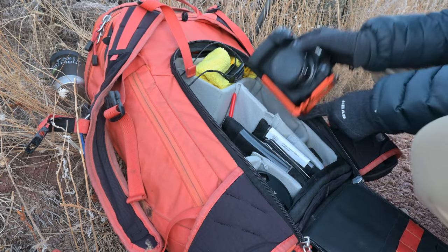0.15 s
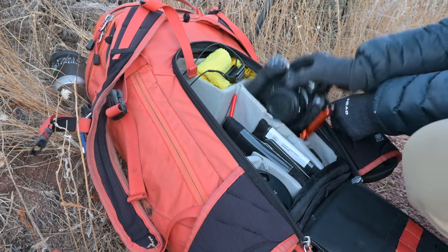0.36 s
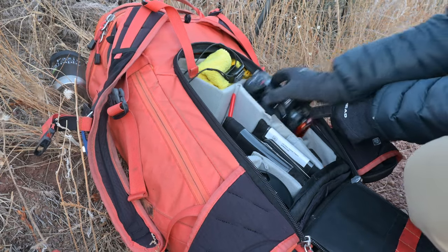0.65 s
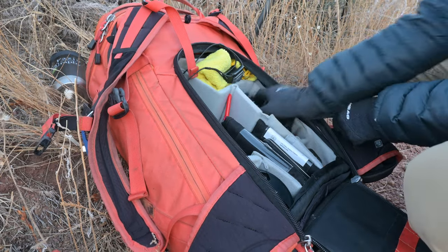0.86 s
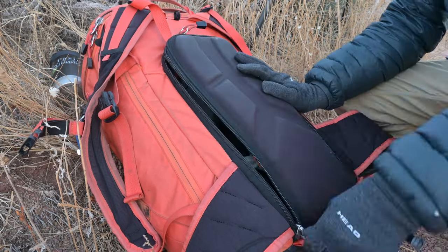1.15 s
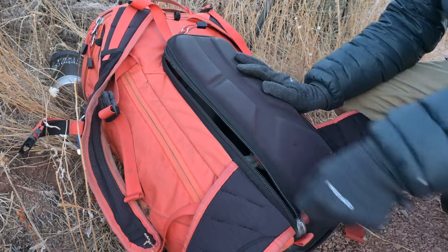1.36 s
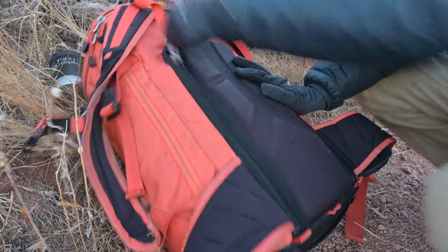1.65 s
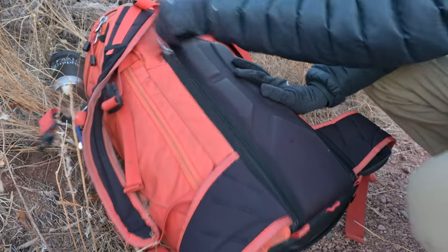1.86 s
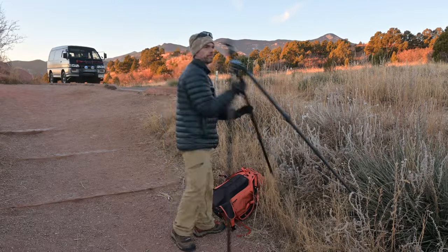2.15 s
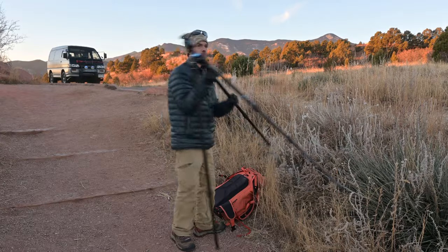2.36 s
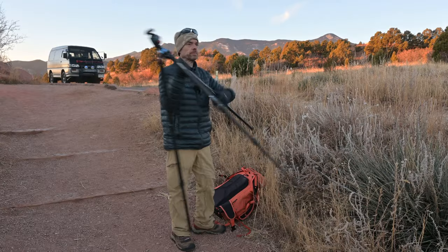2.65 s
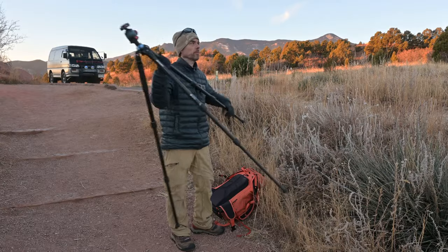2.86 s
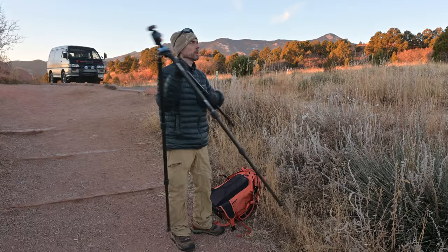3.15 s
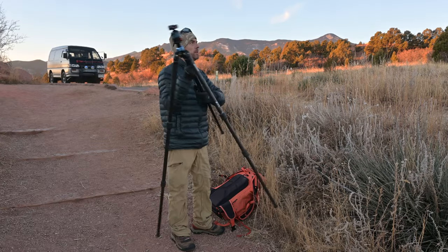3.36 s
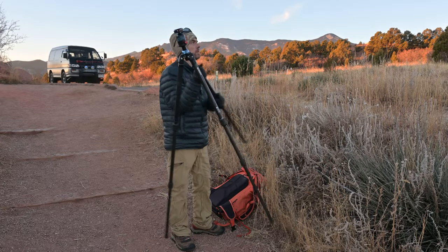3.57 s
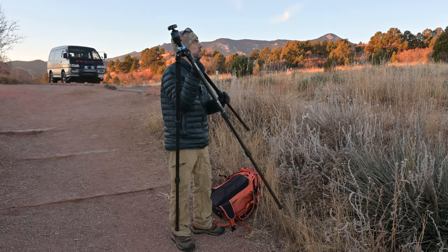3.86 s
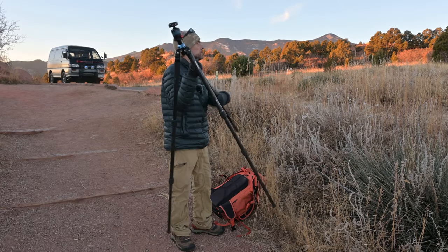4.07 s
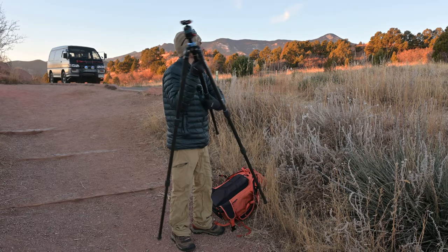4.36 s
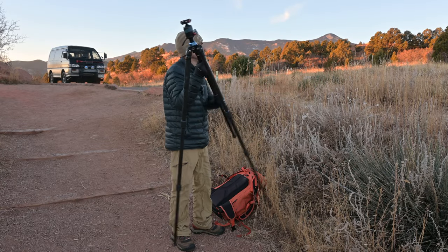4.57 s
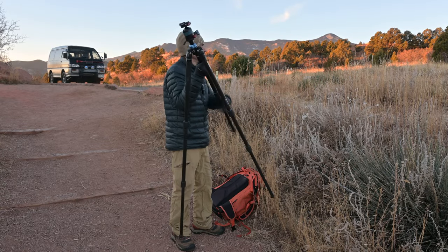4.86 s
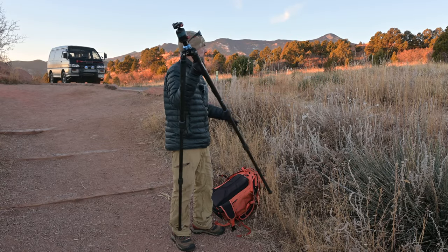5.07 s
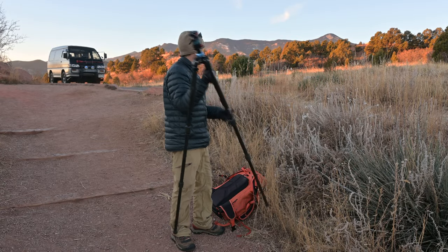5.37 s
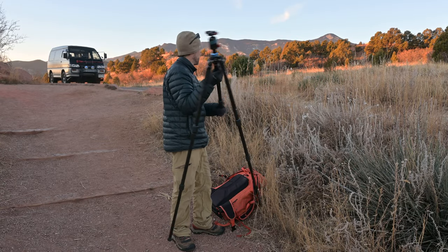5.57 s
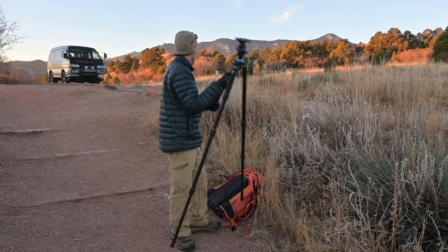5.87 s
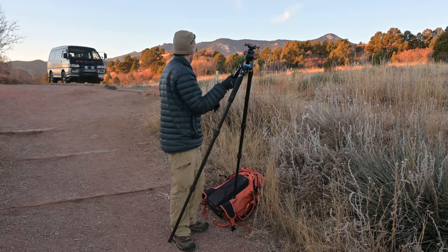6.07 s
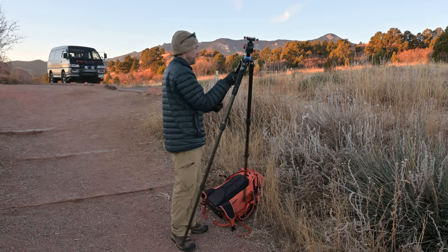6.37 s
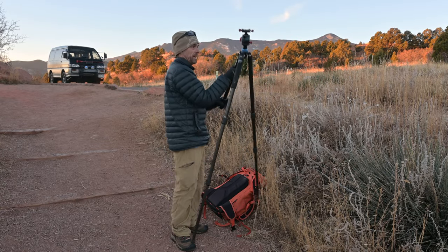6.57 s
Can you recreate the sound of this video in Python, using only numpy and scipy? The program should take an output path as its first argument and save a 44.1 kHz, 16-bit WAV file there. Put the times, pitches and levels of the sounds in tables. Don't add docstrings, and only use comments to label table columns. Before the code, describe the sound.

Close outdoors, gear drops softly into a padded backpack, followed by sharp hook-and-loop crackle. After a quieter moment the zipper ticks, then buzzes quickly shut, snags and continues, with a second short pull around the corner. An abrupt cut brings tripod handling: cloth rustle, small clicks, a hissing leg ending in a loud clack, fumbling, then a latch snap and a second slide and clack. Quiet open air, nearly mono, dry.

```python
import sys
import numpy as np
from scipy import signal
from scipy.fft import rfft, irfft, next_fast_len
from scipy.io import wavfile
from scipy.ndimage import uniform_filter1d

SR = 44100
rng = np.random.default_rng(int(sys.argv[2]) if len(sys.argv) > 2 else 0)


def master_out(mix):
    frames = np.transpose(np.atleast_2d(mix))
    ceiling = np.clip(frames, -1, 1)
    pcm = np.round(ceiling * 32767).astype(np.int16)
    wavfile.write(sys.argv[1], SR, pcm)


def boost_factor(decibels):
    exponent = np.asarray(decibels, float) / 20
    return 10 ** exponent


N = 296295
CUT_S = 2.129

# centre in Hz, width in Hz, level in dB.
PACK = [(264, 160, 9), (534, 570, 15)]
# frequency in Hz, level in dB per Hz.
SCRAPE = [(4000, -20), (5500, -3.5), (8500, 2.5), (10000, -2), (12000, -9), (14500, -4.5), (16500, -9.5)]
# frequency in Hz, level in dB per Hz.
CRUNCH = [(350, -22.5), (650, -0.5), (1000, 1.5), (1800, 0), (3100, -1.5), (4400, -7), (5800, -16)]
# frequency in Hz, level in dB per Hz.
SWISH = [(3500, -20.5), (5500, -5), (8000, 0.5), (10500, 0), (13000, -2.5), (15500, -6), (16500, -11)]
# frequency in Hz, level in dB per Hz.
TUBE = [(300, -24.5), (600, -13.5), (1400, -14), (2100, -9), (3000, -4), (4300, -7), (6200, -16.5),
        (8000, -29.5)]
# frequency in Hz, level in dB per Hz.
BUSHING = [(5000, -18), (6500, -9), (8000, -5.5), (10300, -2), (12500, -3.5), (15500, -9), (16500, -16)]


def noise(size):
    return rng.standard_normal(size)


def evened(x):
    return x / np.sqrt(np.mean(x ** 2) + 1e-20)


def at_peak(x):
    return x / abs(x).max()


def read(points, hz):
    f, value = np.transpose(points)
    return np.interp(np.log(hz + 1), np.log(f + 1), value)


def add(mix, s, sound):
    part = mix[round(s * SR):][:len(sound)]
    part += sound[:len(part)]


def thin(x, hz):
    return signal.sosfilt(signal.butter(2, hz, "high", fs=SR, output="sos"), x)


def coloured(x, spectrum):
    size = next_fast_len(len(x) + 512)
    hz = np.fft.rfftfreq(size, 1 / SR)
    inside = (hz > .6 * spectrum[0][0]) * (hz < 1.3 * spectrum[-1][0])
    gain = boost_factor(read(spectrum, hz)) * inside
    return irfft(rfft(x, size) * evened(gain), size)[:len(x)]


def ringing(modes, soft=0.):
    t = np.arange(2000) / SR
    ring = 0
    for hz, width, db in modes:
        fade = np.exp(-np.pi * width * t)
        ring = ring + boost_factor(db) * np.sqrt(width) * fade * np.sin(2 * np.pi * hz * t)
    ring = ring * (1 - np.exp(-(t / (soft + 1e-5)) ** 2))
    return ring / np.linalg.norm(ring)


def decaying_tones(modes, t):
    return [boost_factor(db - 60 * t / t60) * np.sin(2 * np.pi * hz * t) for hz, db, t60 in modes]


def resonate(x, hz, width):
    turn = np.exp(2j * np.pi * np.cumsum(hz) / SR)
    r = np.exp(-np.pi * width / SR)
    smooth = signal.lfilter([1], [1, -2 * r, r * r], x / turn)
    return evened((turn * smooth).real)


def wander(size, span):
    return evened(uniform_filter1d(uniform_filter1d(noise(size), span), span))


def friction(size, spectrum, per_s, spread_db, flicker_db, span):
    slips = boost_factor(spread_db * np.minimum(rng.exponential(1, size), 3)) * (rng.random(size) < per_s / SR)
    drive = noise(size) * (2.4 + evened(uniform_filter1d(slips, size=40)))
    return evened(coloured(drive * boost_factor(flicker_db * wander(size, span)), spectrum))


def air():
    # frequency in Hz, level in dB per Hz.
    colour = [(30, -23), (92, 7), (157, 4.5), (575, -3), (1650, -6), (2910, -11), (5430, -17),
              (16000, -27.5)]
    swell_db = 1.3 * wander(N, 6000)
    near_db = -2.5 * (np.arange(N) < CUT_S * SR)
    return boost_factor(-66 + swell_db + near_db) * evened(coloured(noise(N), colour))


def rustle():
    # time in seconds, effort in dB, weight on the padding in dB.
    bed = [(0.0, -60, -8.5), (0.438, -62.5, 8), (0.6, -56, -16), (0.788, -62.5, 0.5), (1.05, -68, -3.5),
           (1.41, -80.5, 13), (1.81, -56.5, 3.5), (1.93, -67, 1.5), (2.135, -57, -2.5),
           (2.517, -66.5, -3.5), (2.679, -59, 2.5), (3.005, -66, -3.5), (3.199, -54, -4.5),
           (3.47, -65, 0.5), (3.861, -61, -6.5), (4.73, -69, -12), (5.671, -84.5, 5.5), (6.346, -62, -3.5)]
    # start in seconds, length in seconds, crunch in dB, swish over crunch in dB.
    strokes = [(0.485, 0.203, -78, 14), (0.653, 0.41, -61, -9), (2.136, 0.12, -67, -9),
               (2.462, 0.097, -58.5, -8), (2.531, 0.12, -56.5, -4), (2.752, 0.079, -65, -7),
               (2.656, .06, -88, 12), (2.808, 0.042, -52, 1.5), (3.128, 0.091, -69.5, 16),
               (3.264, 0.107, -60, -9.5), (3.36, 0.097, -62, -7), (3.465, 0.25, -62, 0),
               (4.019, 0.2, -57.5, -10), (4.095, 0.024, -51.5, 5.5), (4.303, 0.151, -55, -10.5),
               (4.413, 0.02, -64, -3), (4.446, 0.16, -71.5, -6), (4.589, 0.089, -60.5, -11.5),
               (4.743, 0.0383, -56.5, -10.5), (4.632, 0.016, -53, -13), (4.778, 0.15, -56.5, -9),
               (4.782, 0.031, -56.5, -8), (4.81, .025, -52.5, -18.5), (4.846, 0.031, -52, -18),
               (5.083, 0.0773, -85.5, 18.5), (5.664, 0.18, -64, -14.5), (5.757, 0.05, -55.5, -14.5),
               (5.85, 0.19, -51, -12), (6.12, 0.085, -63.5, -18), (6.313, 0.17, -64, -22),
               (6.55, 0.13, -77, -24)]
    # frequency in Hz, level in dB per Hz.
    padding_colour = [(90, -17), (160, -2.5), (300, -1.5), (480, 0.5), (700, -14.5), (1000, -34)]
    s, *controls = np.transpose(bed)
    effort_db, weight_db = (np.interp(np.arange(N) / SR, s, c) for c in controls)
    padding = boost_factor(effort_db + weight_db - 4.0)
    crunch = boost_factor(effort_db - 3.5)
    swish = boost_factor(-75.5 + 0.96 * (effort_db + 62.0))
    swell = 0.46
    for s, length, crunch_db, swish_db in strokes:
        u = np.linspace(0, 1, round(length * SR))
        pressure = np.sin(np.pi / 2 * np.minimum(u / swell, (1 - u) / (1 - swell))) ** 0.76
        add(crunch, s, boost_factor(crunch_db) * pressure)
        add(swish, s, boost_factor(crunch_db + swish_db) * pressure)
        add(padding, s, boost_factor(crunch_db - 10.5) * pressure)
    add(padding, 0.498, boost_factor(-54.5) * signal.windows.tukey(round(0.29 * SR), .3))
    return (padding * friction(N, padding_colour, per_s=39.0, spread_db=-1.5, flicker_db=1.06, span=400)
            + crunch * friction(N, CRUNCH, per_s=500.0, spread_db=1.2, flicker_db=1.2, span=250)
            + swish * friction(N, SWISH, per_s=1900.0, spread_db=-0.5, flicker_db=1.5, span=500))


def snap(peak_db, hz):
    t = np.arange(600) / SR
    burst = noise(len(t)) * boost_factor(-60 * t / .0045)
    burst = signal.fftconvolve(burst, ringing([(hz, 0.33 * hz, 0)]))[:len(t)]
    return boost_factor(peak_db) * at_peak(thin(burst, 0.52 * hz))


def snaps():
    # start in seconds, peak in dB, centre in Hz.
    rows = [(.481, -48, 4500), (.498, -42, 6500), (0.498, -38, 13000), (.508, -35, 6900),
            (0.515, -36, 11500), (0.52, -42, 6500), (0.527, -44, 6000), (.534, -32.5, 5900),
            (0.535, -37, 11000), (.579, -42, 6000), (.599, -43, 11000), (0.614, -40, 6000),
            (.63, -42, 6500), (0.629, -40, 11500), (.646, -42, 5960), (.646, -48, 11500), (.66, -44, 14000),
            (.676, -45, 13000), (.69, -48, 12000), (0.712, -48, 7170), (.735, -43, 4500), (.788, -50, 4000),
            (2.052, -54, 7000), (2.106, -40, 7000), (2.705, -51, 6500), (2.807, -47, 7000),
            (2.902, -42.5, 6455), (4.284, -50, 2500), (4.293, -58, 6470), (4.389, -43, 9040),
            (4.389, -39, 3000), (4.483, -48, 5500), (4.626, -35, 3250), (4.676, -55.5, 6480),
            (4.75, -48.5, 1985), (4.91, -49, 1800), (5.155, -53, 6560), (5.2457, -34.5, 3510),
            (5.77, -39.5, 3000), (5.99, -47.5, 5460), (6.091, -60, 4465), (6.131, -51, 6000),
            (.473, -48, 11500), (.549, -45, 12000), (.558, -44, 9000), (.57, -47, 6500), (.587, -43, 11000),
            (.611, -44, 13500), (.725, -47.5, 13000), (0.7601, -31, 4500), (.773, -48, 13500),
            (.853, -50.5, 14000), (.913, -46, 6000), (4.414, -42.5, 2200), (4.788, -46, 1800),
            (5.906, -47, 2500), (5.94, -46, 3500)]
    out = np.zeros(N)
    for s, peak_db, hz in rows:
        add(out, s, snap(peak_db, hz))
    return out


def tap(peak_db, hz, edge_db, t60):
    # frequency in Hz, level in dB per Hz.
    scratch_colour = [(2800, -6), (4200, 10.5), (6500, 5.5), (9000, 1.5), (11500, 5), (16000, -14.5)]
    t = np.arange(4000) / SR
    blow = noise(len(t)) * boost_factor(-60 * t / (1.78 * t60))
    near = rng.uniform(1.0, 1.5, 3)
    body = ringing([(hz, 0.95 / t60 + 0.036 * hz, 0)] + [(hz * r, 2.5 / t60, -8) for r in near])
    knock = signal.fftconvolve(blow, body)[:len(t)]
    edge = coloured(noise(len(t)) * boost_factor(-60 * t / (0.52 * t60)), scratch_colour)
    return boost_factor(peak_db) * at_peak(knock) + boost_factor(edge_db - 3.0) * edge


def small_blows():
    # start in seconds, peak in dB, ring in Hz, bright edge in dB.
    knocks = [(0.233, -57, 650, -59), (0.283, -52, 233, -84), (0.353, -43.5, 330, -73),
              (0.393, -38.5, 398, -48), (0.432, -42.5, 266, -54), (0.478, -53, 900, -58),
              (0.758, -39.5, 540, -38.5), (0.994, -48.5, 342, -66), (1.335, -58, 248, -55),
              (1.556, -33, 1110, -58), (1.6425, -21, 2590, -51), (1.802, -39, 402, -64),
              (1.974, -25, 780, -59)]
    # start in seconds, peak in dB, ring in Hz, bright edge in dB.
    taps = [(2.613, -41, 820, -67), (2.703, -52, 356, -70), (2.9, -52, 850, -62),
            (3.27, -43.5, 3560, -50.5), (3.295, -45.5, 2380, -58.5), (3.496, -35, 562, -44.5),
            (3.779, -51, 364, -64.5), (3.99, -61.5, 243, -61), (4.097, -46, 900, -60),
            (4.104, -41.5, 900, -59), (4.112, -40, 549, -55), (4.283, -59, 554, -60.5),
            (4.356, -41.5, 523, -60.5), (4.387, -41, 934, -49), (4.412, -41.5, 1010, -66),
            (4.622, -36, 1477, -64), (4.676, -53.5, 965, -63), (4.787, -44.5, 940, -63),
            (4.811, -41.5, 2416, -64), (5.768, -56, 1200, -69.5), (5.914, -45.5, 1150, -57.5),
            (5.959, -45, 758, -63.5), (6.017, -45, 2980, -62.5), (6.119, -54, 1453, -67.5),
            (6.156, -48, 550, -58.5), (6.179, -51, 2100, -80), (6.308, -47, 344, -80.5)]
    # start in seconds, peak in dB, ring in Hz, bright edge in dB.
    ticks = [(0.818, -42, 3100, -56), (2.308, -49, 760, -70), (2.513, -38, 1600, -62),
             (2.554, -49, 920, -54), (2.939, -54, 2000, -70), (3.0022, -52, 1000, -75),
             (3.0125, -33, 1750, -60), (3.0135, -37, 2900, -62), (3.029, -39, 3100, -60),
             (3.4955, -34, 3600, -52), (6.213, -36.5, 899, -70)]
    out = np.zeros(N)
    for rows, t60 in ((knocks, .018), (taps, 0.032), (ticks, 0.0067)):
        for s, peak_db, hz, edge_db in rows:
            add(out, s, tap(peak_db, hz, edge_db, t60))
    return out


def jingles():
    # start in seconds, peak in dB, pitch in Hz, seconds to fall by 60 dB.
    rows = [
        (.232, -47.5, 7140, .015),
        (2.062, -57, 8558, 0.02765),
        (2.062, -58, 5979, .03),
        (2.101, -51.5, 8650, 0.21),
        (2.113, -41.5, 8070, 0.024),
        (2.773, -31.5, 7800, 0.0087),
        (2.773, -45, 8900, 0.013),
        (2.772, -52, 15000, .015),
    ]
    out, t = np.zeros(N), np.arange(4000) / SR
    for s, db, hz, t60 in rows:
        heard = (s > CUT_S) | (s + t < CUT_S)
        tone = decaying_tones([(hz, db, t60)], t)[0]
        add(out, s, heard * tone * np.minimum(t / 0.0008, 1))
    return out


def thump():
    out = np.zeros(N)
    add(out, 0.3932, boost_factor(-30) * at_peak(ringing([(235, 110, 0)], soft=.002)))
    return out


def hook_and_loop():
    # frequency in Hz, level in dB per Hz.
    colour = [(3500, -8), (6000, 8), (8500, -15), (10500, -2), (13000, -2), (15500, -1), (16500, -13)]
    start, end, per_s = .465, .72, 260.
    size = round((end - start) * SR)
    releases = boost_factor(4. * noise(size)) * (rng.random(size) < per_s / SR)
    one_hook = noise(60) * boost_factor(-np.arange(60) * 0.12)
    tearing = coloured(signal.fftconvolve(releases, one_hook), colour)
    pull = np.interp(np.linspace(0, 1, size + 59), [0, .1, .16, 1], [.15, .2, 1, .55])
    out = np.zeros(N)
    add(out, start, boost_factor(-55) * tearing * pull)
    return out


def latch():
    # pitch in Hz, level in dB, seconds to fall by 60 dB.
    modes = [(534, -15.5, 0.068), (940, -9, 0.037), (1490, -15.5, 0.029), (2030, 0, 0.027),
             (2480, -2.5, 0.013), (2935, 5, 0.013), (3720, -17, 0.0085)]
    # seconds after release, level in dB.
    contacts = [
        (.0008, 0),
        (.0015, 4),
        (.0052, -20),
        (.009, -17),
    ]
    t = np.arange(3000) / SR
    hits = sum(boost_factor(db) * np.exp(-((t[:600] - s) / .00005) ** 2) for s, db in contacts)
    rough_hits = hits * (1 + 0.34 * noise(600))
    click = signal.fftconvolve(rough_hits, sum(decaying_tones(modes, t)))[:len(t)]
    late = np.maximum(t - contacts[0][0], 0)
    edge = coloured(noise(len(t)) * boost_factor(-60 * late / 0.014), BUSHING)
    edge = edge + 0.62 * coloured(noise(len(t)) * boost_factor(-60 * late / 0.023), TUBE[2:])
    out = np.zeros(N)
    add(out, 5.2475, thin(boost_factor(-21.5) * at_peak(click) + boost_factor(-42) * edge * (late > 0), 870.0))
    return out


def slide(rows, grip_db, cut_hz, opening_db, pipe_db):
    # pitch in Hz, width in Hz, level in dB,
    # share of the pitch rise, fade over the slide in dB.
    air_column = [(1400, 180, -2, 1, -21.5), (2560, 250, -2.5, .42, -12.5), (3660, 280, -2, 0.44, -4)]
    s, *columns = np.transpose(rows)
    t = np.arange(s[0], s[-1], 1 / SR)
    tube_db, pitch = (np.interp(t, s, c) for c in columns)
    drawn = np.linspace(0, 1, len(t))
    wall = evened(coloured(noise(len(t)), TUBE))
    bushing = evened(coloured(noise(len(t)), BUSHING))
    free = evened(coloured(noise(len(t)), CRUNCH)) * boost_factor(opening_db) * drawn ** 1.9
    rub = noise(len(t))
    pipe = 0
    for hz, width, db, share, fade_db in air_column:
        pipe = pipe + boost_factor(db + fade_db * drawn ** 2.5) * resonate(rub, hz * pitch ** share, width)
    tube = evened(boost_factor(pipe_db) * pipe + 1.3 * evened(thin(wall, cut_hz)) + free)
    bushing_db = tube_db + grip_db + .3 * (tube_db - tube_db.max())
    return s[0], boost_factor(tube_db) * tube + boost_factor(bushing_db) * bushing


def leg_slides():
    # time in seconds, rubbing in dB, pitch of the free tube as a factor.
    pulls = [
        [(3.012, -56.5, 3), (3.025, -50.5, 2.3), (3.042, -44.5, 1.9), (3.07, -41.5, 1.7), (3.11, -43.5, 5),
         (3.137, -42.5, 3.4)],
        [(5.257, -68, 0.62), (5.3, -53.5, 1), (5.35, -46, 1.1), (5.42, -44.5, 1.26), (5.48, -48, 1.25),
         (5.547, -51, 1.6)],
        [(3.458, -59, 0.68), (3.475, -50.5, 0.84), (3.515, -49, 0.99), (3.55, -60.5, 0.64), (3.59, -53, 0.66),
         (3.66, -74, 1.16)],
        [(2.461, -66.5, 1.1), (2.47, -58.5, 1), (2.52, -77, 1.5), (2.64, -86, 0.5)],
    ]
    grips_db = (5.5, 4, -10, -6)
    # the gripped tube carries little below this, in Hz.
    cuts_hz = (1400, 700, 900, 1800)
    # the wall's low hiss, let out as the tube runs free, in dB.
    openings_db = (-13.5, 2, -19, -20)
    # how much of it sings in the air column, in dB.
    pipes_db = (-8.5, -2, -5.5, -7)
    out = np.zeros(N)
    for rows, *grip in zip(pulls, grips_db, cuts_hz, openings_db, pipes_db):
        add(out, *slide(rows, *grip))
    return out


def stop(blow_db, chatter_s, low_db, crack_db, modes, bounces, rebound_db):
    # frequency in Hz, level in dB per Hz.
    crack_colour = [(3800, -13), (5000, -7), (7500, -2), (9800, 1), (11500, -2), (13500, -7.5),
                    (16500, -22.5)]
    t = np.arange(8000) / SR
    chatter = noise(len(t)) * np.exp(-(t / chatter_s) ** 4) * np.minimum(t / 0.00024, 1)
    rings = decaying_tones(modes, t)
    contacts = sum(boost_factor(db) * np.exp(-((t[:400] - s) / .00004) ** 2) for s, db in bounces)
    clack = signal.fftconvolve(contacts, sum(rings[4:]))[:len(t)]
    hang = boost_factor(low_db + 6.0) * sum(rings[:4]) * np.minimum(t / (0.55 * chatter_s), 1) ** 2
    crack = coloured(chatter * boost_factor(-60 * t / 0.03), crack_colour)
    rebound = noise(len(t)) * boost_factor(-22.5 - 60 * t / 0.03)
    thrown_back = coloured(rebound, CRUNCH) + boost_factor(rebound_db) * coloured(rebound, SWISH)
    return boost_factor(blow_db) * (at_peak(clack) + hang + boost_factor(crack_db) * at_peak(crack) + thrown_back)


def leg_stops():
    # start in seconds, blow in dB, chatter in seconds, low ring in dB, bare crack in dB.
    blows = [
        (3.1378, 8, 0.0026, -10.5, -6),
        (5.5486, -4, 0.0033, -4, -6.5),
    ]
    # pitch in Hz, level in dB, seconds to fall by 60 dB.
    legs = [
        [(420, -37.5, 0.15), (520, -14, 0.016), (640, -14, 0.026), (847, -9.5, 0.026), (1150, -14.5, 0.02),
         (1420, -23.5, 0.069), (1704, -3.5, 0.0098), (2200, -3, 0.008), (3060, 9, 0.0069), (3600, 8.5, 0.005),
         (4270, -7, .005), (1460, -8, 0.0097), (8640, -13.5, 0.018), (10000, -1, 0.0056)],
        [(414, -32.5, 0.15), (495, -22.5, 0.055), (620, -1.5, 0.01), (900, -19, 0.033), (1200, -10.5, 0.014),
         (1790, -5, 0.039), (2117, -6.5, 0.011), (3000, -21.5, 0.0036), (3490, 10.5, 0.0046), (4960, -1, .006),
         (5700, 2, 0.0077), (7000, -6, 0.0069), (12410, 17.5, 0.0079), (13690, 7, .005)],
    ]
    # seconds after the first contact, level in dB.
    bounces = [
        [(.0003, -2), (.0009, -9.5), (.0015, 1.5), (.0021, 2)],
        [(.0003, 1), (.0007, -1.5), (.0012, 1), (.002, 3.5), (.0027, 0)],
    ]
    # treble thrown back afterwards, in dB.
    rebounds_db = (-11, -16.5)
    # the leg radiates little below this, in Hz.
    cuts_hz = (360, 210)
    out = np.zeros(N)
    for (s, *blow), cut_hz, *leg in zip(blows, cuts_hz, legs, bounces, rebounds_db):
        add(out, s, thin(thin(stop(*blow, *leg), cut_hz), cut_hz))
    return out


def tooth(thud_db, tick_db, scrape_db, panel):
    # centre in Hz, width in Hz, level in dB.
    struck_slider = [(900, 620, 11.5), (1800, 370, 5.5), (3450, 790, -2), (5100, 2400, -1)]
    t = np.arange(2000) / SR
    pack, slider = ([(hz * rng.uniform(0.72, 1.265), width, db + 3 * rng.standard_normal())
                     for hz, width, db in body] for body in (panel, struck_slider))
    thud = ringing(pack, 0.0049)
    tick = signal.fftconvolve(noise(len(t)) * boost_factor(-60 * t / 0.02), ringing(slider, 0.00013))[:len(t)]
    puff = coloured(noise(len(t)) * boost_factor(-60 * t / 0.019), SCRAPE)
    return boost_factor(thud_db) * at_peak(thud) + boost_factor(tick_db - 0.5) * at_peak(tick) + boost_factor(scrape_db + 2.0) * puff


def zipper_run(rows):
    # centre in Hz, width in Hz, level in dB.
    slider = [(890, 356, 14.5), (1278, 1160, 26.5), (1797, 740, 17.5), (2255, 490, 12.5), (3330, 240, 7),
              (4800, 2160, 25)]
    s, *columns = np.transpose(rows)
    t = np.arange(s[0], s[-1], 1 / SR)
    hz, pull_db, lag = (uniform_filter1d(np.interp(t, s, c), size=120, mode="nearest") for c in columns)

    octaves = np.log2(hz / 500)
    thud_db = -44 + 1.85 * pull_db - 7.5 * octaves
    buzz_db = -38 + pull_db + 6.1 * octaves
    scrape_db = -60.5 + .6 * pull_db + 14 * octaves

    second = np.minimum(hz / 940, 1)
    uneven_hz = 11000.0 / hz * wander(len(t), 60)
    turns = 2 * np.pi * np.cumsum(hz + uneven_hz) / SR
    k = np.arange(1, 30)[:, None]
    top_hz = 4430.0 * np.minimum(hz / 745, 1) ** 0.72
    comb = np.cos(k * turns) + second * np.cos(k * (turns - 2 * np.pi * lag))
    comb = comb * np.exp(-(k * hz / top_hz) ** 4)
    clicks = comb.sum(0) * np.sqrt(hz / 1000.0) * boost_factor(1.2 * wander(len(t), 50))
    clicks += 0.3 * noise(len(t)) * (1 + 1.7 * np.cos(turns))
    parts = [signal.fftconvolve(clicks, body)[:len(t)]
             for body in (ringing(PACK, 0.0032), ringing(slider, 0.00057))]
    thud, buzz = (p / np.sqrt(uniform_filter1d(p ** 2, size=500) + 1e-12) for p in parts)

    scrape = evened(coloured(noise(len(t)) * (1 + 1.4 * np.cos(turns)), SCRAPE))
    sing = evened(coloured((np.cos(k * turns) * (k * hz < .4 * SR)).sum(0), SCRAPE))
    scrape = scrape + boost_factor(-3 + 3. * wander(len(t), 150)) * (hz / 1000.) ** 4 * sing

    from_s, to_s = 1.644, 1.668
    seized = np.sin(np.pi * np.clip((t - from_s) / (to_s - from_s), 0, 1)) ** .5
    chatter = boost_factor(-36) * seized * (np.cos(3 * turns) + .35 * np.cos(4 * turns))
    fade = signal.windows.tukey(len(t), 200 / len(t))
    return s[0], fade * (boost_factor(thud_db) * thud + boost_factor(buzz_db) * buzz + boost_factor(scrape_db) * scrape + chatter)


def zipper():
    # time in seconds, teeth per second in Hz, pull in dB,
    # lag of the second row as a share of the tooth period.
    pulls = [
        [(1.543, 227, -3, 0.39), (1.56, 317.6, -1, 0.5), (1.581, 359, 0, 0.18), (1.6, 560, -0.5, 0.48),
         (1.621, 833, 1, 0.24), (1.634, 845, 0, 0.42), (1.641, 940, 0, 0.26), (1.646, 800, -25, .35)],
        [(1.645, 762, -5.5, 0.21), (1.661, 797, -6, 0.28), (1.671, 1019, -2, 0.37), (1.68, 1037, -3.5, 0.44),
         (1.693, 835, -0.5, 0.44), (1.706, 924, -4, 0.5), (1.727, 789, -1, 0.29), (1.745, 292.4, 7.5, 0.3),
         (1.756, 247, 2.5, 0.34)],
        [(1.971, 330, -2.5, 0.052), (1.979, 564, -3.5, 0.08), (1.986, 640, 5.5, 0.12), (1.994, 620, -3.5, 0.11),
         (2.0, 520, -2.5, 0.089), (2.006, 400, -4, 0.045)],
        [(2.094, 205, -4.5, 0.16), (2.114, 272, -5.5, 0.18), (2.13, 264, -2, 0.096)],
    ]
    # start in seconds, thud in dB, tick over thud in dB.
    creeps = [(1.421, -52, 5), (1.4358, -57, 12), (1.4534, -43.5, -7), (1.468, -41.5, -2.5),
              (1.48, -38, -6), (1.494, -41.5, -4), (1.5033, -44, -4), (1.52, -47.5, 2), (1.5352, -40.5, -1),
              (1.7444, -25, -20), (1.7561, -20, -17), (1.761, -22, -10.5), (1.768, -26, -9),
              (1.777, -29.5, -8), (1.936, -36, -5.5), (1.947, -32, -8), (1.956, -32, -11),
              (1.962, -34, -1.5), (1.97, -26.5, -15), (2.009, -34.5, -10), (2.019, -41.5, -3),
              (2.027, -41.5, -1), (2.038, -43.5, 0), (2.05, -48, 2), (2.062, -47, 2), (2.073, -45.5, -6),
              (2.078, -49.5, 11.5), (2.084, -49.5, 5)]
    taut = (472, 190, 8.3)
    out = np.zeros(N)
    for rows in pulls:
        add(out, *zipper_run(rows))
    for s, db, tick_db in creeps:
        panel = PACK + [taut] * (s > 1.9)
        add(out, s, tooth(db, db + tick_db, db + tick_db - 29, panel))
    return out


def scene():
    # frequency in Hz, side minus mid in dB.
    width = [(60, -36), (250, -50), (1000, -44), (2000, -36), (4000, -26), (8000, -18), (15000, -13)]
    gear = snaps() + small_blows() + jingles() + thump() + hook_and_loop()
    legs = latch() + leg_slides() + leg_stops()
    mid = rustle() + gear + legs + zipper()
    mid = signal.sosfilt(signal.butter(3, 140., "high", fs=SR, output="sos"), mid) + air()
    smear = noise(301) * np.exp(-abs(np.arange(301) - 150) / 40)
    other = signal.fftconvolve(mid, smear / np.linalg.norm(smear), "same")
    side = irfft(1j * rfft(other) * boost_factor(read(width, np.fft.rfftfreq(N, 1 / SR))), N)
    side = side + boost_factor(-26) * air()
    return np.array([mid + side, mid - side])


def band_limit(x):
    return signal.sosfilt(signal.butter(12, 15800, fs=SR, output="sos"), x)


def record(dry):
    mid = dry.mean(0)
    band = signal.butter(2, [150, 15800], "band", fs=SR, output="sos")
    held = signal.sosfilt(band, np.clip(mid, -.86, .86) - mid)
    return band_limit(dry + held)


dry = scene()
out = record(dry)
master_out(out)
```